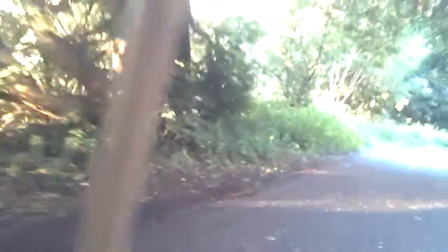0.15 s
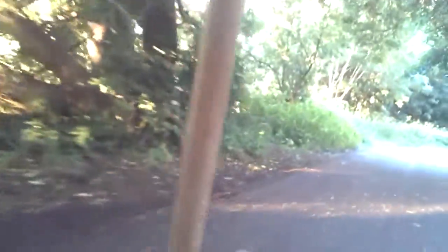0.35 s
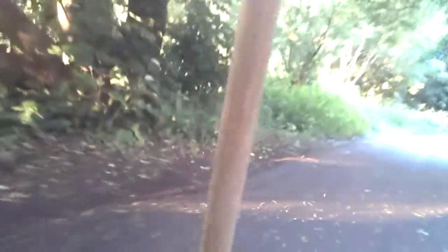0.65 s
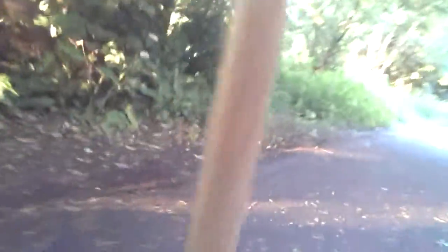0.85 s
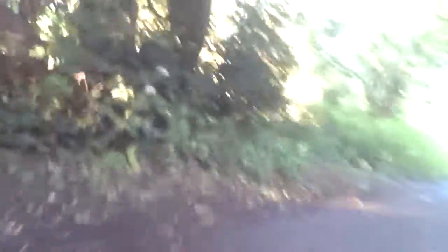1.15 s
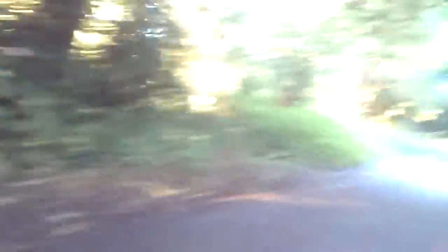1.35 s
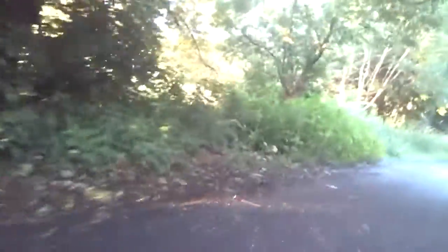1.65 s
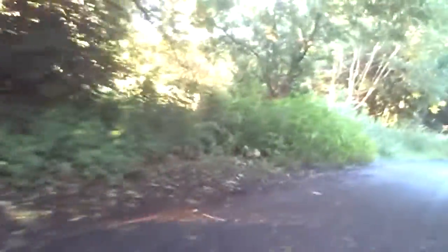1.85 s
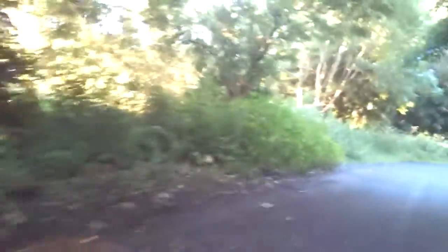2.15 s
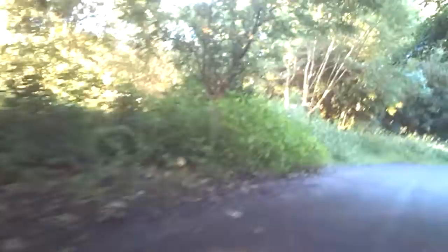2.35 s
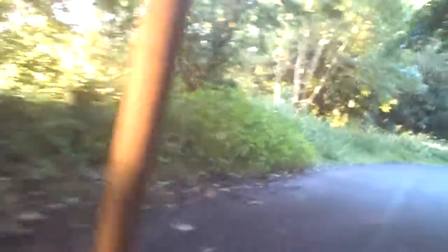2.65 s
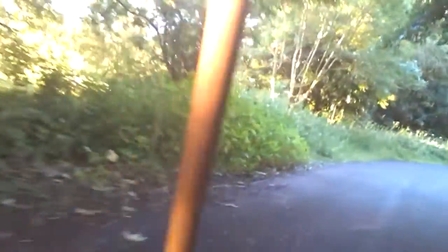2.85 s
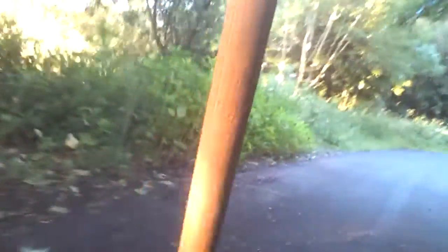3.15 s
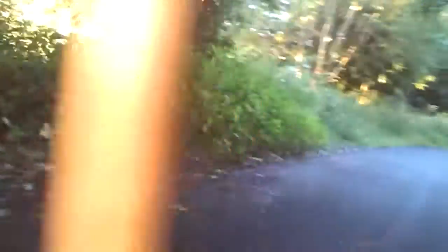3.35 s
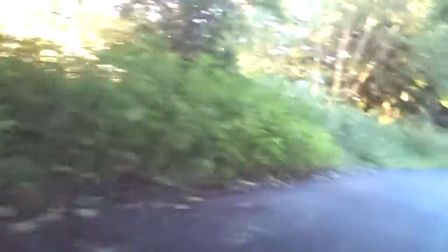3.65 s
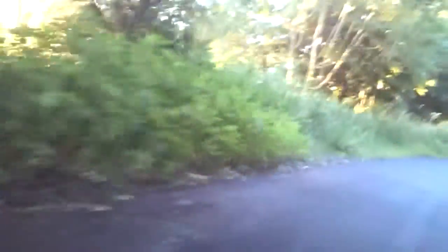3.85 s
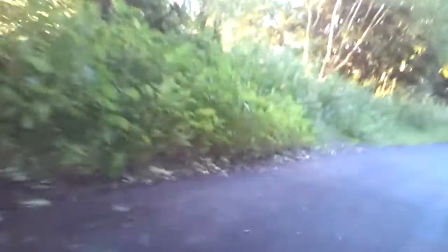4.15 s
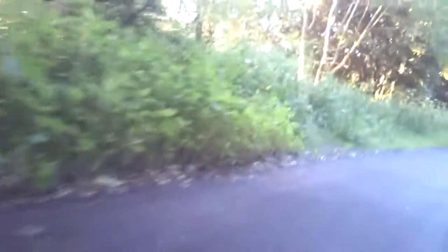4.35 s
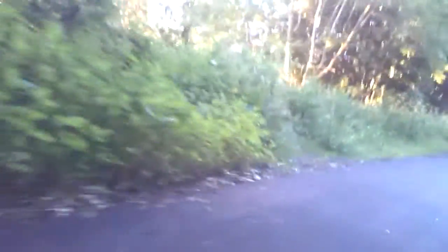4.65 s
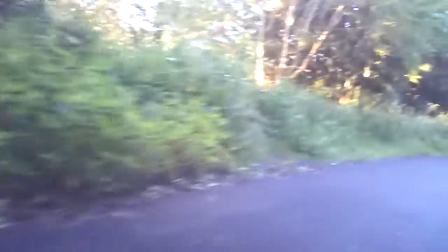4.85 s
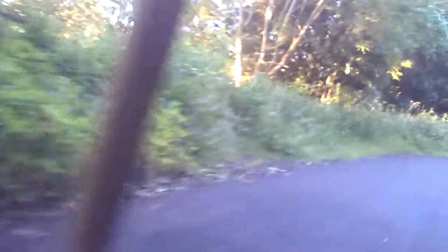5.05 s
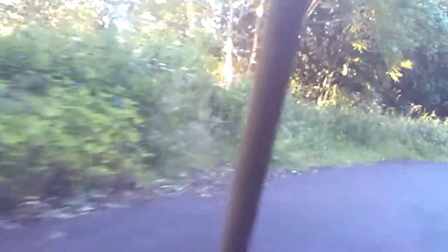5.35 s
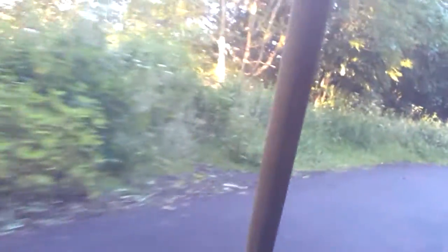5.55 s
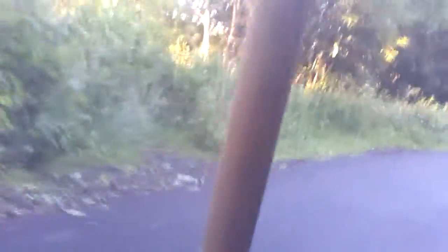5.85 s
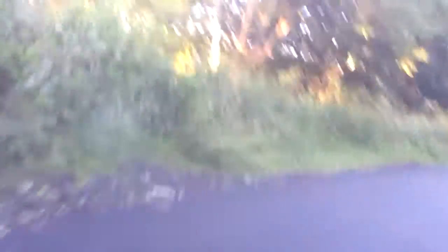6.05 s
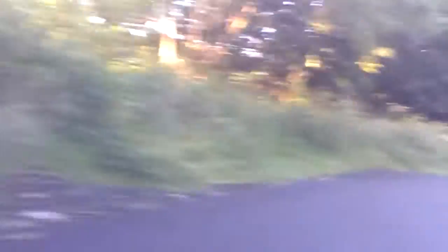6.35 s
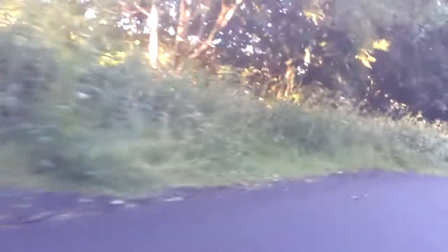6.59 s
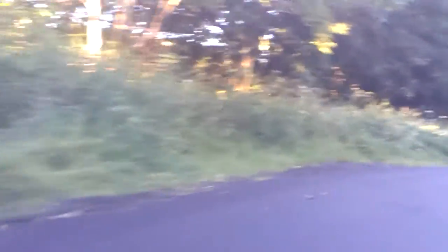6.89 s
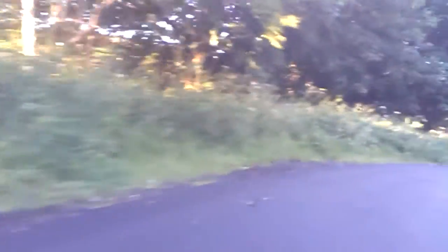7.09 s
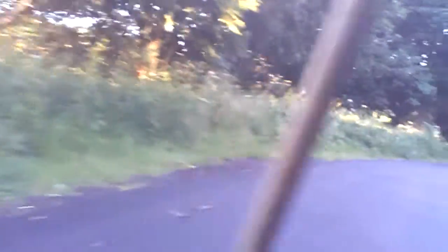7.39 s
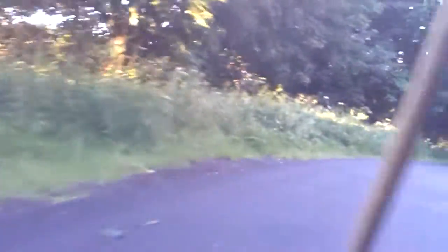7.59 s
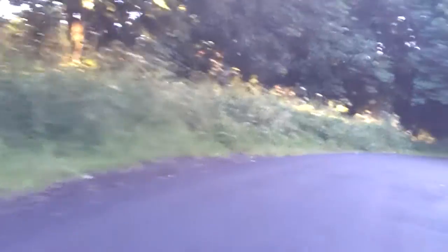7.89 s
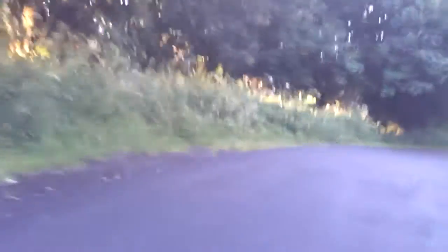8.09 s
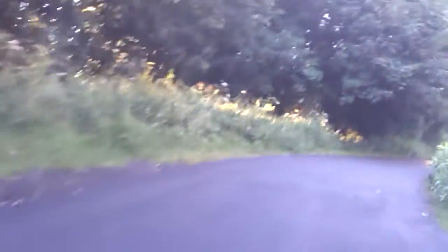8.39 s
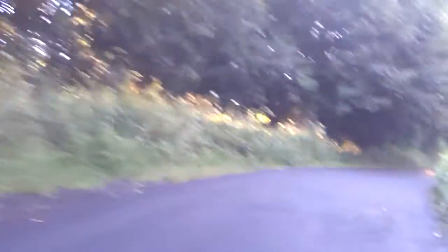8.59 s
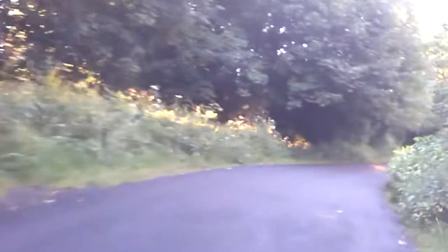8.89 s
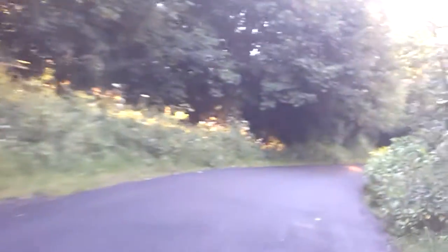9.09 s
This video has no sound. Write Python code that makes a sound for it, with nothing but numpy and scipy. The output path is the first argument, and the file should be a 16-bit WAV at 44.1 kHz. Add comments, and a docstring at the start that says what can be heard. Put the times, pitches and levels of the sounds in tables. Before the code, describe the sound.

A longboard rolls over rough tarmac with sharp clicks, knocks and grainy hiss, while wind buffets lightly and a songbird sings.

```python
"""A longboard rolls at an even pace along a rough tarmac path through a wood, pushed on with a pole.
Random impacts of the road grain excite the deck's modes, and both axles thump over cracks.
The pole tip chatters when planted and scrapes by stick-slip friction. Close on the right sound
sharp clicks, light ticks and a fine, grainy hiss that fades over time. Air buffets the microphones,
a few dull bumps pass, and a songbird sings on the left, its notes scattered by the trees."""
import sys
import numpy as np
from scipy import signal
from scipy.fft import rfft, irfft, next_fast_len
from scipy.io import wavfile
from scipy.ndimage import uniform_filter1d, map_coordinates

SR = 44100
rng = np.random.default_rng(int(sys.argv[2]) if len(sys.argv) > 2 else 0)


def persist_wave(psi):
    """Save psi, clipped to +-1, as 16-bit WAV."""
    counts = np.round(np.clip(psi, -1, 1) * 32767).astype(np.int16)
    wavfile.write(sys.argv[1], SR, np.atleast_2d(counts).T)


N = 407043
TIME = np.arange(N) / SR


def undb(db):
    """Amplitude ratio of a level in decibels."""
    return 10 ** (np.asarray(db) / 20)


def unit(x):
    """Normalisation to rms 1."""
    return x / np.sqrt(np.mean(x ** 2))


def curve(table):
    """Linear interpolation of (time, value) points at every sample."""
    return np.interp(TIME, *np.transpose(table))


def per_bin(points, size):
    """Interpolation of (frequency, value) points over FFT bins, in log frequency."""
    hz, value = np.transpose(points)
    return np.interp(np.log(np.fft.rfftfreq(size, 1 / SR) + 1), np.log(hz), value)


def colour(x, points):
    """Zero-phase filtering by a (frequency, level) spectrum."""
    length = x.shape[-1]
    size = next_fast_len(length + min(length, SR // 4))
    return irfft(rfft(x, size) * undb(per_bin(points, size)), size)[..., :length]


def low_cut(x, hz):
    """Second-order Butterworth high-pass."""
    return signal.sosfilt(signal.butter(2, hz, "high", fs=SR, output="sos"), x)


def walk(rate):
    """Low-pass noise at rms 1: random values held for 1 / rate seconds and smoothed twice."""
    hold = max(int(SR / rate), 1)
    steps = np.repeat(rng.standard_normal(N // hold + 1), hold)
    return unit(uniform_filter1d(uniform_filter1d(steps, hold), hold)[:N])


def add(out, s, sound):
    """Superposition of a sound that starts at s seconds."""
    i = max(int(s * SR), 0)
    out[:, i:i + sound.shape[-1]] += sound[..., :N - i]


def pan(db):
    """Gain pair for a level difference, left minus right."""
    return undb(np.array([[db], [-db]]) / 2)


def decay(t, t60):
    """Exponential damping: 60 dB lost in t60 seconds."""
    return np.exp(-np.log(1000) * t / t60)


def ring(t, hz, t60):
    """Free vibration of one damped mode."""
    return np.sin(2 * np.pi * hz * t) * decay(t, t60)


def modal_sum(t, modes, t60_scale=1):
    """Impulse response as a superposition of damped modes."""
    return sum(undb(db) * ring(t, hz, t60 * t60_scale) for hz, db, t60 in modes)


def impulses(rate, spread_db):
    """Shot noise: two independent trains of uneven impulses, at a mean rate per second."""
    struck = rng.random((2, N)) < rate / SR
    push = rng.standard_normal((2, N))
    size_db = spread_db * np.minimum(rng.standard_normal((2, N)), 1.3)
    return unit(struck * push * undb(size_db))


def wheel_turn(depth_db, turn_hz=11):
    """Amplitude modulation: slightly unround wheels press harder once and twice a turn."""
    angle = 2 * np.pi * np.cumsum(turn_hz * (1 + 0.032 * walk(1.978))) / SR
    return undb(depth_db * (np.sin(angle) + np.sin(2 * angle)))


# Bird notes: (time [s], duration [s], start [Hz], end [Hz], source level [dB], trill depth [ratio])
BIRD_NOTES = [(4.799, 0.12, 3780, 3180, -54.5, 0.058), (4.911, 0.085, 3150, 2877, -50, 0.025),
              (5.127, 0.088, 3410, 3330, -50.5, 0.039), (5.204, 0.22, 3320, 3220, -55.5, .006),
              (5.218, 0.22, 3610, 3560, -59, .006), (5.676, 0.13, 7740, 7340, -48.5, 0.052),
              (5.831, 0.18, 7870, 8460, -49, 0.013), (6.017, .07, 8200, 7900, -51, .004),
              (6.096, .07, 6960, 7160, -51, .006), (6.135, .04, 6560, 5700, -51, .01),
              (6.196, 0.22, 6090, 5460, -46.5, 0.065), (6.397, 0.09, 3860, 3750, -51, .035),
              (6.416, 0.087, 3490, 2750, -50.5, .045), (6.541, 0.095, 2900, 4970, -49.5, 0.037),
              (6.631, 0.1, 5280, 5320, -48.5, 0.1), (6.756, 0.075, 5040, 4920, -50, .04),
              (6.892, 0.098, 6900, 6580, -48, .01), (7.004, 0.11, 4820, 4600, -47.5, 0.051),
              (7.099, 0.07, 4840, 4470, -49, 0.15), (7.303, 0.13, 3300, 4330, -48.5, .006),
              (7.475, 0.037, 4650, 4930, -51, .008), (7.573, 0.043, 5800, 4670, -51, .04),
              (7.624, 0.12, 5300, 5400, -55, 0.086), (9.168, .06, 4680, 4600, -55, .004)]

def bird(wood_t60=0.77, direct_db=-8.5, trill_hz=140, flicker_db=2, glide_rate=1.26):
    """Frequency modulation gives glides and trills; scattering by trunks and leaves gives an echo."""
    voice = np.zeros((1, N))
    trill = np.sin(2 * np.pi * np.cumsum(trill_hz * (1 + 0.35 * walk(80))) / SR) + 0.416 * walk(500)
    for s, length, start_hz, end_hz, db, depth in BIRD_NOTES:
        size = int(length * SR)
        glide = np.expm1(-glide_rate * np.linspace(0, 1, size)) / np.expm1(-glide_rate)  # fast, then slow
        hz = (start_hz + (end_hz - start_hz) * glide) * (1 + depth * np.roll(trill, -int(s * SR))[:size])
        whistle = np.sqrt(2) * np.sin(2 * np.pi * np.cumsum(hz) / SR)
        add(voice, s, undb(db) * signal.windows.tukey(size, .4) * whistle)
    voice *= undb(flicker_db * walk(120))
    wood = unit(rng.standard_normal((2, SR)) * decay(TIME[:SR], wood_t60)) / np.sqrt(SR)
    echo = signal.fftconvolve(voice, wood, axes=1)[:, :N]
    return undb(direct_db) * pan(db=16) * voice + pan(db=0.5) * echo


# Airflow at the microphones: (time [s], level [dB])
AIRFLOW_LEVEL = [(0, -59), (1.4, -50), (2.7, -60), (4.1, -49), (6.3, -49), (7.1, -60), (8.3, -56),
                 (8.7, -53), (9.23, -52)]
# Gusts: (centre time [s], duration [s], envelope peak [dB], left minus right [dB])
AIR_GUSTS = [(1.6, .8, -47, -12), (5.34, .18, -44, 12), (6.05, .3, -42, 13), (6.77, .14, -43, -6),
             (8.58, .15, -41, -7)]
# Buffeting spectrum: (frequency [Hz], level [dB])
BUFFET_SPECTRUM = [(22, -47), (35, -26), (50, -14), (80, -11), (115, -7.5), (160, -10), (250, -15),
                   (500, -75)]

def wind(swing_db=6.5):
    """Turbulent pressure: the air of the ride buffets each microphone separately, with gusts on top."""
    unsteadiness_db = swing_db * np.array([walk(11), walk(10)])
    force = pan(db=-1.5) * undb(curve(AIRFLOW_LEVEL) + unsteadiness_db)
    for s, length, db, balance_db in AIR_GUSTS:
        add(force, s - length / 2, undb(db) * pan(balance_db) * signal.windows.hann(int(length * SR)))
    return unit(colour(rng.standard_normal((2, N)), BUFFET_SPECTRUM)) * force


# Soft, low bumps: (time [s], relative level [dB], frequency [Hz], left minus right [dB])
LOW_BUMPS = [(6.002, -22, 105, 13), (6.049, -21.5, 170, 11), (6.133, -25, 110, 10), (8.563, -28.5, 105, -8)]

def bumps(swell_s=0.0045, gain_db=-2):
    """Tone bursts of only a few cycles are heard as dull bumps."""
    out, t = np.zeros((2, N)), TIME[:SR // 10]
    envelope = t / swell_s * np.exp(1 - t / swell_s)
    for s, db, hz, balance_db in LOW_BUMPS:
        add(out, s, undb(db + gain_db) * pan(balance_db) * envelope * np.sin(2 * np.pi * hz * t))
    return low_cut(out, hz=60)


# Dry burst of a snap: (frequency [Hz], level [dB])
SNAP_SPECTRUM = [(400, -25), (1300, 5), (2100, 13), (3600, 5.5), (5400, 3.5), (7500, -3.5), (9000, 0),
                 (10200, 1), (12000, 5), (15000, -3)]
# Woody modes under a snap: (frequency [Hz], level [dB], t60 [s])
WOODY_MODES = [(1997, -4.5, 0.018), (2530, -10, 0.0097), (3300, -1.5, 0.019), (4200, 1.5, 0.0098),
               (5160, 8, 0.0077), (9960, 6.5, 0.0078)]
# Acoustic shadow of the camera at the far, left microphone: (frequency [Hz], gain [dB])
SHADOW_FILTER = [(1500, 16), (5500, 10.5), (8000, 10), (12000, -15), (15000, -29)]

def snap(db, hz, t60, balance_db, ring_db=2.0, ring_t60=0.0019, purity=1.26, woody_db=1.5):
    """Resonance: a noise burst with a woody body excites a high ring; a light snap is nearly all ring."""
    t = TIME[:SR // 20]
    burst = unit(colour(rng.standard_normal((2, len(t))) * decay(t, t60), SNAP_SPECTRUM))
    resonance = ring(t, hz, ring_t60)
    tone = signal.fftconvolve(signal.fftconvolve(burst[1], resonance), resonance)[:len(t)]
    knock = burst + undb(woody_db) * unit(modal_sum(t, WOODY_MODES))
    left = unit(colour(knock[0], SHADOW_FILTER))
    right = unit(unit(knock[1]) + undb(ring_db - purity * db) * unit(tone))
    return undb(db) * np.array([undb(balance_db) * left, right]) / np.abs(right).max()


# Clicks: (time [s], right peak [dB], ring frequency [Hz], burst t60 [s], left minus right [dB])
SHARP_CLICKS = [(0.068, -17.5, 6400, 0.0084, -23), (0.313, -19, 6860, .006, -25),
                (0.354, -15.5, 7100, 0.007, -25), (0.4306, -18, 7200, .005, -20),
                (0.655, -13.5, 7000, 0.007, -28), (.771, -20.5, 5930, 0.012, -21),
                (0.8242, -19.5, 6900, 0.007, -23), (1.1645, -18.5, 6650, 0.0071, -24),
                (1.3518, -15, 7440, 0.0091, -26), (1.522, -18.5, 7100, .006, -26),
                (2.0235, -15, 7100, .006, -24), (2.0574, -25, 3300, .008, -5),
                (2.063, -7.5, 6200, 0.012, -16), (2.0702, -14, 8260, 0.0079, -18),
                (2.158, -16.5, 7050, .006, -26), (2.8095, -20, 6700, .006, -22),
                (3.019, -24.5, 5300, 0.023, -7), (3.2747, -18.5, 7160, 0.0086, -30),
                (3.6215, -3, 6450, 0.013, -7.5), (3.647, -14, 7340, 0.025, -11),
                (3.879, -12, 7700, 0.01, -18), (3.912, -15.5, 6800, 0.0066, 2),
                (4.0936, -11, 7750, 0.012, -19), (4.0938, -17, 3470, 0.014, -9),
                (4.1038, -19, 7800, 0.01, -11), (4.106, -18, 7400, 0.022, -13),
                (4.1144, -18, 8150, 0.0079, -16), (4.366, -21, 8150, 0.01, -23),
                (4.4048, -12.5, 6930, 0.011, -40), (4.457, -20.5, 7500, 0.0076, -26),
                (4.62, -22, 7040, .006, -26), (4.868, -23, 7000, .006, -26),
                (5.124, -21, 7000, 0.0053, -26), (6.7519, -5, 7630, 0.016, -12.5),
                (6.759, -18, 7200, 0.046, -5), (6.9436, -5.5, 6900, 0.0055, -22),
                (6.9467, -9.5, 7050, 0.013, -10), (7.5201, -16, 7440, 0.0045, -31),
                (7.7847, -21, 7800, 0.015, -26), (8.5889, -4, 7500, 0.0055, -12),
                (8.6084, -16, 6640, 0.035, -1), (8.9792, -25.5, 7000, 0.0087, -25)]

def clicks():
    """Sharp transients, placed close on the right by the level difference between the channels."""
    out = np.zeros((2, N))
    for s, db, hz, t60, balance_db in SHARP_CLICKS:
        add(out, s, snap(db, hz, t60, balance_db))
    return out


# Fading contour of the hiss, which ticks and bass also follow: (time [s], relative level [dB])
HISS_LEVEL = [(0, -5), (.7, 0.5), (1.35, -1.1), (2.4, -5), (2.95, -5), (3.4, -9.5), (3.9, -6.5), (5.4, -12),
              (6.9, -10.5), (8.8, -17.5), (9.23, -19.5)]
# Strength of the top sizzle: (time [s], relative level [dB])
SIZZLE_ENVELOPE = [(0, -51), (1.0, -47.5), (3.9, -56), (5.4, -69), (7.2, -66), (9.23, -66)]
# Spectra of the left and right hiss, the sizzle and the wheel rasp: (frequency [Hz], level [dB])
LEFT_HISS_SPECTRUM = [(1500, -27), (2800, -17), (4200, -16), (5500, -8), (7000, -15), (9000, -20.5),
                      (12000, -30.5), (15000, -104)]
RIGHT_HISS_SPECTRUM = [(1500, -13.5), (2800, -14.5), (4200, -10.5), (5500, -3.5), (6300, 2), (6900, 5),
                       (7900, -1.5), (9000, -9), (11000, -20), (15000, -61)]
SIZZLE_SPECTRUM = [(6000, -26), (9000, -2.5), (10200, 2.5), (12000, 5), (15000, 1.5)]
RASP_SPECTRUM = [(900, -37), (1450, -15), (1800, 0.5), (2050, 0), (2350, -3.5), (2700, -5.5), (4000, -6),
                 (8000, -30)]
HISS_DB = -38.5  # reference level of hiss and ticks

def hiss(crackle_db=-11, left_db=-2, rasp_db=-53.5):
    """Filtered shot noise: a fine, grainy hiss close on the right fades over time, above a faint rasp."""
    contour_db = curve(HISS_LEVEL)
    grains = unit(impulses(rate=9000, spread_db=-0.5) + undb(crackle_db) * impulses(rate=110, spread_db=2))
    left = undb(left_db) * colour(grains[0], LEFT_HISS_SPECTRUM)
    right = colour(grains[1], RIGHT_HISS_SPECTRUM)
    slopes = np.array([[0.45], [0.9]])  # share of the contour, left and right
    body = unit(np.array([left, right])) * undb(HISS_DB + slopes * contour_db)
    sizzle = unit(colour(grains, SIZZLE_SPECTRUM)) * undb([[-18], [3]])
    sizzle *= undb(curve(SIZZLE_ENVELOPE) + 1.6 * walk(28))
    rasp = unit(colour(impulses(rate=3000, spread_db=-2), RASP_SPECTRUM)) * pan(db=-0.5)
    rasp *= undb(rasp_db + 0.25 * contour_db)
    flutter = undb(1.44 * walk(45)) * wheel_turn(depth_db=-0.23)
    return flutter * (body + sizzle + rasp)


def light_ticks(per_second=10, above_hiss_db=16, spread_db=3):
    """A random point process: light ticks close on the right, softer as the hiss fades."""
    out = np.zeros((2, N))
    contour_db = curve(HISS_LEVEL)
    for place, strength in rng.random((int(per_second * N / SR), 2)):
        i = int(place * N)
        db = HISS_DB + contour_db[i] + above_hiss_db + spread_db * (2 * strength - 1)
        add(out, TIME[i], snap(db, hz=7150, t60=0.0086, balance_db=-24))
    return out


# Pole tip meeting the tarmac: (time [s], relative level [dB], hops [count], first-hop offset [dB])
POLE_PLANTS = [(0.9425, -23, 4, -6.5), (1.082, -37, 2, 0), (1.143, -34, 3, -3), (1.2232, -33, 2, 4),
               (1.31, -45, 3, 5), (3.018, -41, 1, -2), (3.401, -18, 4, -8.5), (3.868, -27.5, 1, 2.5),
               (5.976, -18.5, 3, -4), (6.1388, -37.5, 1, 2.5), (8.6066, -30, 1, 1)]
# Scuff of the tip: (frequency [Hz], level [dB])
SCUFF_SPECTRUM = [(500, 9), (1100, 3), (1600, 5), (1900, 7.5), (2250, 8), (2800, -5), (3600, -12.5),
                  (5000, -10), (6800, -2), (9000, -35), (14000, -38)]

def pole_plants(gain_db=-1, rise_s=0.00065, fall_s=0.0072, gap_s=0.0203, loss_db=3.5):
    """Contact chatter: the planted rubber tip skips in evenly spaced scuffs, its rebounds fading."""
    out, t = np.zeros((2, N)), TIME[:SR // 20]
    envelope = (1 - np.exp(-t / rise_s)) * np.exp(-t / fall_s)
    for s, db, hops, touch_db in POLE_PLANTS:
        for hop in range(hops):
            noise = rng.standard_normal((2, len(t))) + rng.standard_normal(len(t))
            scuff = unit(colour(noise, SCUFF_SPECTRUM)) * envelope
            change_db = touch_db if hop == 0 else -loss_db * hop
            add(out, s + hop * gap_s, undb(db + gain_db + change_db) * scuff)
    return out


# Drags of the tip: (time [s], duration [s], level [dB], left minus right [dB])
POLE_DRAGS = [(1.227, 0.2, -46, -9), (3.629, 0.18, -48.5, -5), (6.235, 0.15, -39.5, -8),
              (6.325, 0.03, -34.5, -1), (8.397, 0.065, -47.5, -8), (8.528, 0.13, -42.5, 2),
              (9.157, 0.22, -44, 3)]
# Scrape of the tip: (frequency [Hz], level [dB])
SCRAPE_SPECTRUM = [(1200, 10.5), (2400, 6), (3200, 10.5), (4200, 9), (5700, 13.5), (7500, 9), (10000, 3.5),
                   (12000, -13), (15000, -25)]

def pole_drags(slip_hz=170, slip_fall_db=8):
    """Stick-slip friction: the dragged tip releases pulses of noise at an uneven rate."""
    out = np.zeros((2, N))
    slip_phase = np.cumsum(slip_hz * (1 + 0.29 * walk(90))) / SR % 1
    slips = undb(-slip_fall_db * slip_phase + 2 * walk(120))
    for s, length, db, balance_db in POLE_DRAGS:
        size = int(length * SR)
        friction = rng.standard_normal((2, size)) * np.roll(slips, -int(s * SR))[:size]
        scrape = unit(colour(friction, SCRAPE_SPECTRUM)) * signal.windows.tukey(size, .6)
        add(out, s, undb(db) * pan(balance_db) * scrape)
    return out


# Modes of the deck: (frequency [Hz], level [dB], t60 [s])
DECK_MODES = [(333, -9, 0.032), (480.2, 24, 0.038), (659, 8, 0.054), (1098, 8, 0.033), (2110, -6, 0.014)]

def deck_ring(t, t60_scale=1):
    """Modal response of the deck to a blow; a narrow plank radiates little bass."""
    return low_cut(modal_sum(t, DECK_MODES, t60_scale), hz=240)


# Modes of the trucks: (frequency [Hz], level [dB], t60 [s])
TRUCK_MODES = [(1050, -5.5, 0.019), (1170, -1.5, 0.025), (1940, -4, 0.025), (2060, 0, 0.023),
               (3630, -7.5, 0.015), (5300, -9, .006)]
# An axle drops over a crack or rebounds: (time [s], knock peak [dB], contact time [ms],
# deck t60 scale [ratio], deck pitch [ratio], clack relative to knock [dB])
AXLE_IMPACTS = [(1.073, -20, 0.72, 3.7, 0.94, -20), (1.142, -14.5, 0.72, 2.9, 0.97, -10.5),
                (1.248, -14.5, 0.94, 3.6, 0.99, -12), (1.8490, -3, 0.53, 1.16, 0.95, -19.5),
                (2.0733, -3.5, 0.42, 0.32, 0.98, -15.5), (2.08, -26, 0.87, 0.24, 0.99, -3),
                (3.021, -15, 0.67, .5, 0.97, -20), (3.8858, 0, 0.7, 1.6, 0.99, -13),
                (4.1071, -2, 0.32, 0.47, 0.94, -15), (4.1114, -13.5, 0.66, 0.7, 0.7, -11),
                (6.5343, -2.5, 0.66, 1.36, 0.98, -24), (6.712, -6.5, 0.89, 0.49, 0.92, -16.5),
                (6.7596, -9.5, 0.49, 0.72, 0.82, -16)]

def cracks(rattle_s=0.0022, bend_db=-23):
    """Impact excitation: the deck rings at a load-dependent pitch and thuds; the truck rattles."""
    out, t = np.zeros((2, N)), TIME[:SR // 10]
    truck = modal_sum(t, TRUCK_MODES)
    bend = undb(bend_db) * low_cut(ring(t, hz=132, t60=0.088), hz=110)
    for s, db, contact_ms, t60_scale, pitch, clack_db in AXLE_IMPACTS:
        age = t * 1000 / contact_ms
        push = age * (1 - age / 2) * np.exp(-age)  # the wheel drops off one edge and strikes the other
        knock = low_cut(signal.fftconvolve(push, deck_ring(t * pitch, t60_scale))[:len(t)], hz=277)
        knock /= np.abs(knock).max()
        rattle = rng.standard_normal((2, len(t))) * t * np.exp(-t / rattle_s)
        clack = signal.fftconvolve(rattle, truck[None], axes=1)[:, :len(t)]
        clack /= np.abs(clack).max()
        add(out, s, undb(db) * (knock + bend + undb(clack_db) * clack))
    return out


# Rumble of board and wheels: (frequency [Hz], level [dB])
RUMBLE_SPECTRUM = [(15, -67), (25, -60), (64, -20), (118, -6.5), (161, -7.5), (191, -8), (296, -4.5),
                   (412, -4), (473, -1.5), (593, -14), (670, -10.5), (885, -22.5), (1170, -27.5),
                   (1320, -36), (1600, -41), (2080, -39), (3520, -120)]
# Likeness of the rumble at the two microphones: (frequency [Hz], coherence [0-1])
RUMBLE_COHERENCE = [(60, 0.98), (130, 0.99), (290, 1), (520, 1), (620, 0.58), (850, 0.47), (1100, 0.7),
                    (1500, 0)]
# Balance of the rumble: (frequency [Hz], left minus right [dB])
RUMBLE_BALANCE = [(60, -5), (110, -3.5), (200, -1), (330, 0.5), (480, -1), (580, 5), (690, -5.5), (900, -1),
                  (1300, -0.5)]

def road_rumble():
    """Partial coherence: the road's rumble reaches the microphones as a shared and an opposed part."""
    size = next_fast_len(N)
    shared, opposed = rfft(impulses(rate=6000, spread_db=-0.5), size)
    coherence = np.clip(per_bin(RUMBLE_COHERENCE, size), 0, 1)
    sides = np.array([[1], [-1]])
    spectrum = shared * np.sqrt(1 + coherence) + sides * opposed * np.sqrt(1 - coherence)
    spectrum *= undb(sides * per_bin(RUMBLE_BALANCE, size) / 2)
    return unit(low_cut(colour(irfft(spectrum, size)[:, :N], RUMBLE_SPECTRUM), hz=105))


# Coarseness of the tarmac: (time [s], relative level [dB])
ROAD_ROUGHNESS = [(0, -29), (0.8, -31), (1.25, -29), (2.4, -29.5), (3.15, -31), (3.65, -29), (4.4, -29.5),
                  (5.8, -30), (6.4, -28.5), (7.05, -30), (7.75, -29.5), (8.1, -32), (8.4, -30),
                  (8.8, -30.5), (9.23, -28.5)]
# Ring of the deck against the rumble: (time [s], level [dB])
DECK_RING_LEVEL = [(0, -9), (.58, -16.5), (.9, -11), (1.2, -6.5), (1.55, -7), (3.2, -10.5), (3.7, -2.5),
                   (4.4, -15), (5.3, -5.5), (5.65, -23), (6.4, -6), (7.0, -17), (7.45, -3), (8.1, -9),
                   (8.4, -0.5), (8.9, -27)]

def rolling(flex=0.022, gain_db=0.68, bass_hz=190):
    """Forced vibration: stones in the tarmac shake the board, and the deck rings on above the rumble."""
    rumble = road_rumble()
    bass = signal.sosfiltfilt(signal.butter(3, bass_hz, fs=SR, output="sos"), rumble)
    bass_gain = undb(2.5 + 0.52 * curve(HISS_LEVEL))  # the bass fades along with the hiss
    # sparse, uneven impacts with a dip near 1100 Hz set the deck ringing
    coarse = colour(impulses(rate=250, spread_db=4.5)[0], [(500, -8.0), (1100, -22.5), (2100, -7)])
    ringing = unit(signal.fftconvolve(coarse, deck_ring(TIME[:SR // 10]))[:N])
    # the deck flexes under the rider, so its modes wander
    ringing = map_coordinates(ringing, [np.cumsum(1 + flex * walk(7))], order=1, mode="mirror")
    board = rumble + (bass_gain - 1) * bass + undb(curve(DECK_RING_LEVEL)) * ringing
    return board * undb(curve(ROAD_ROUGHNESS) + gain_db) * wheel_turn(depth_db=0.6)


def scene(lag_samples=8):
    """Superposition of all sources; the board's sound reaches the left microphone slightly later."""
    left, right = rolling() + cracks()
    board = np.array([np.roll(left, lag_samples), right])
    return (board + hiss() + clicks() + pole_plants() + pole_drags()
            + wind() + bumps() + bird() + light_ticks())


def record(dry, top_hz=14750):
    """Saturation at full scale, then band limiting by a steep low-pass."""
    return signal.sosfilt(signal.ellip(10, .2, 70, top_hz, fs=SR, output="sos"), np.clip(dry, -1, 1))


dry = scene()
out = record(dry)
persist_wave(out)
```